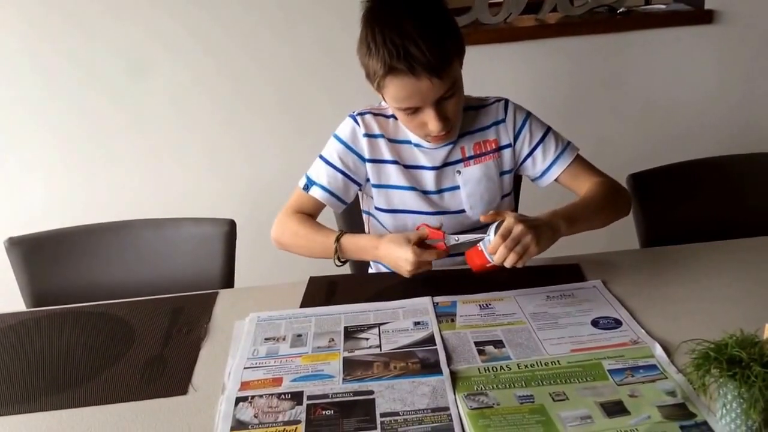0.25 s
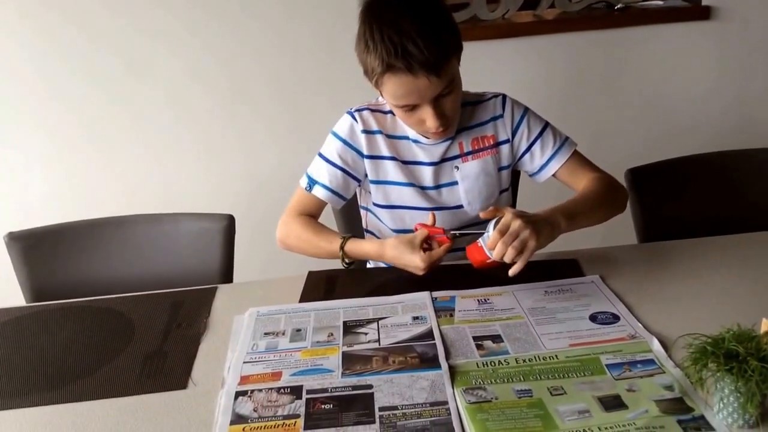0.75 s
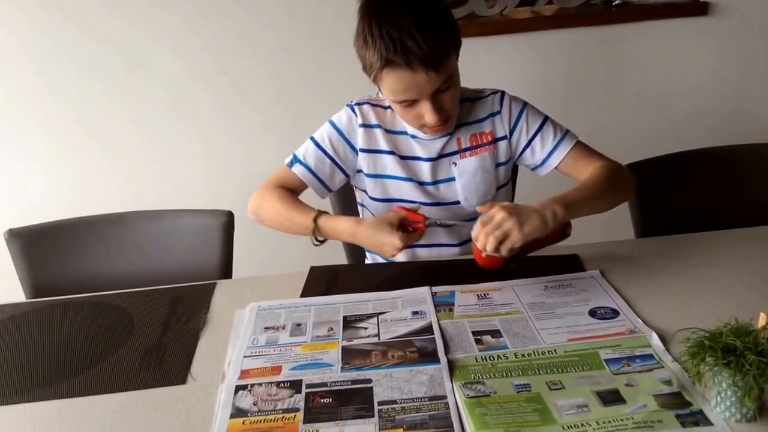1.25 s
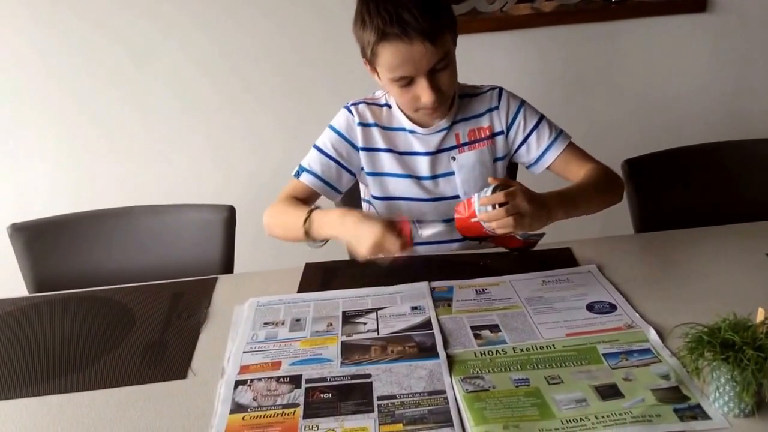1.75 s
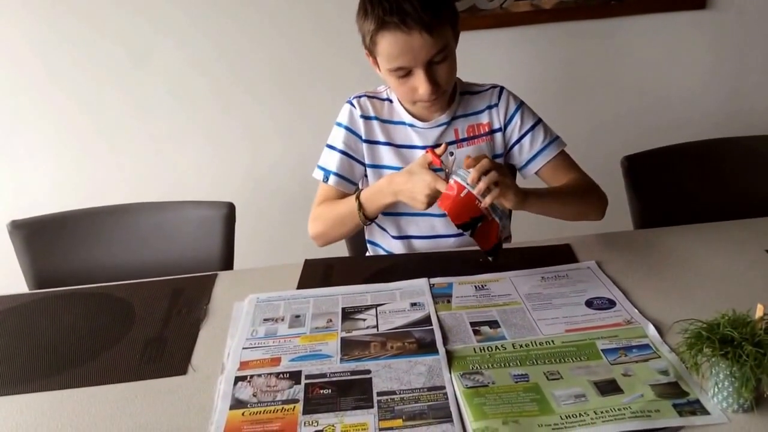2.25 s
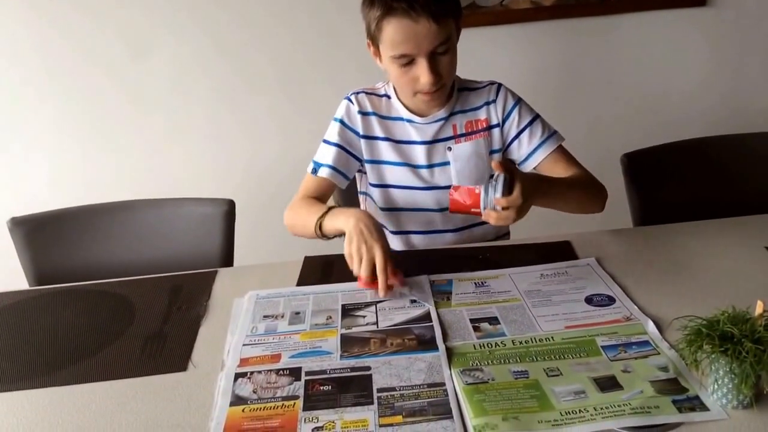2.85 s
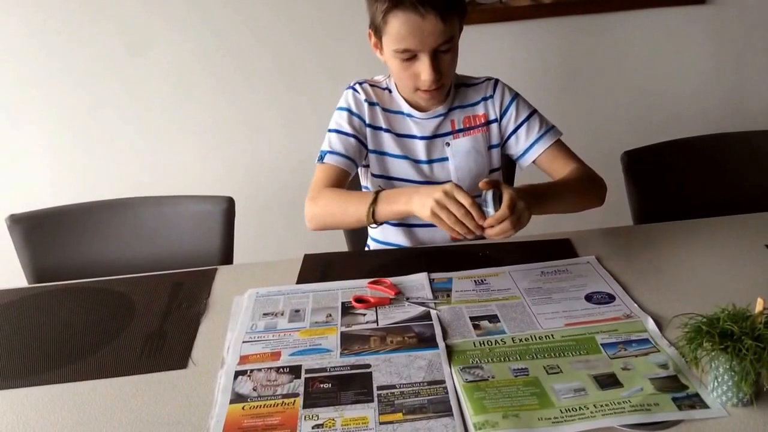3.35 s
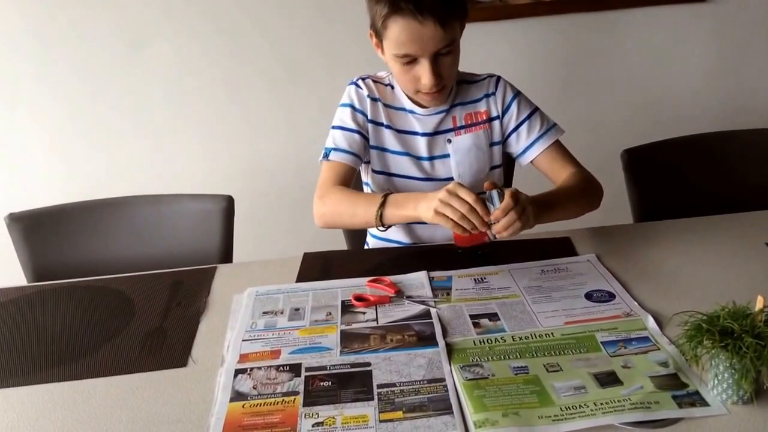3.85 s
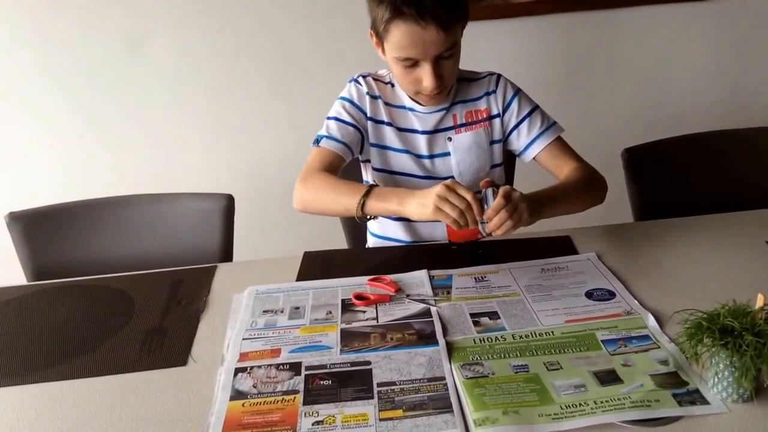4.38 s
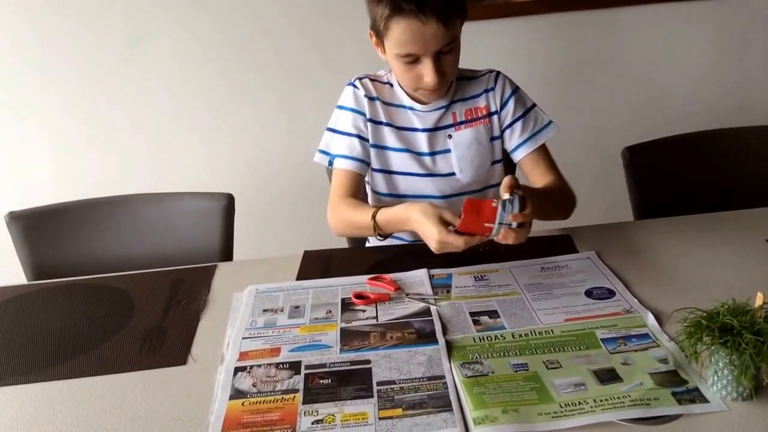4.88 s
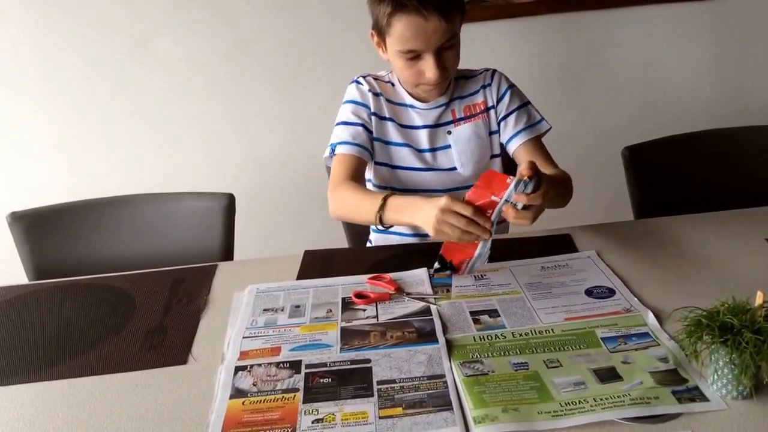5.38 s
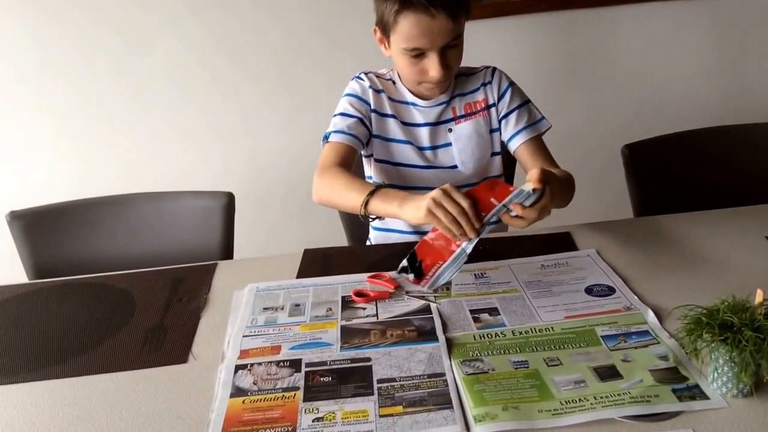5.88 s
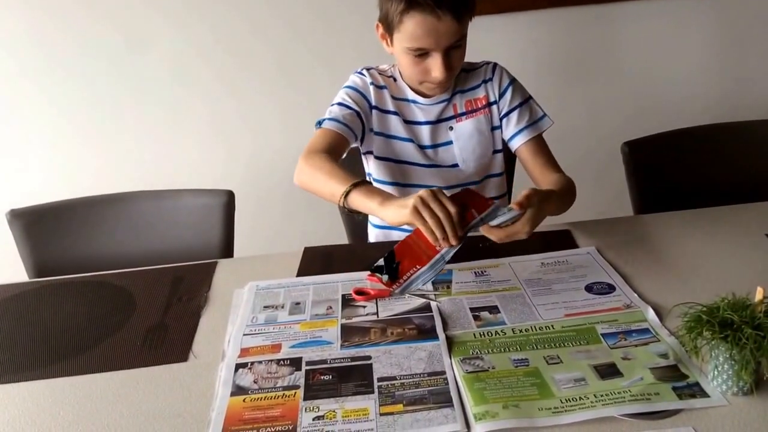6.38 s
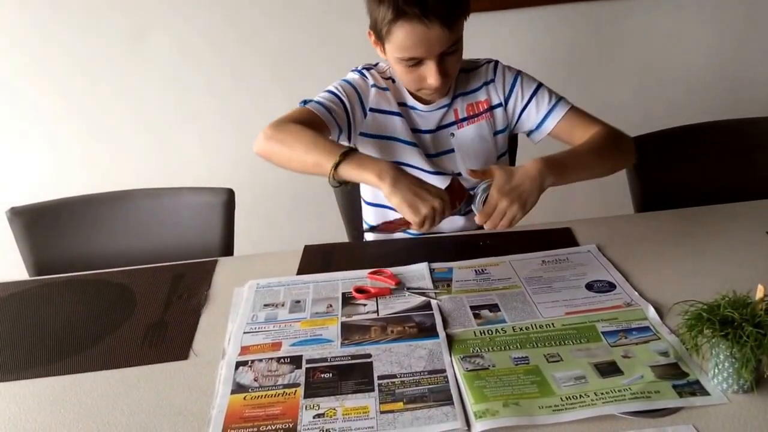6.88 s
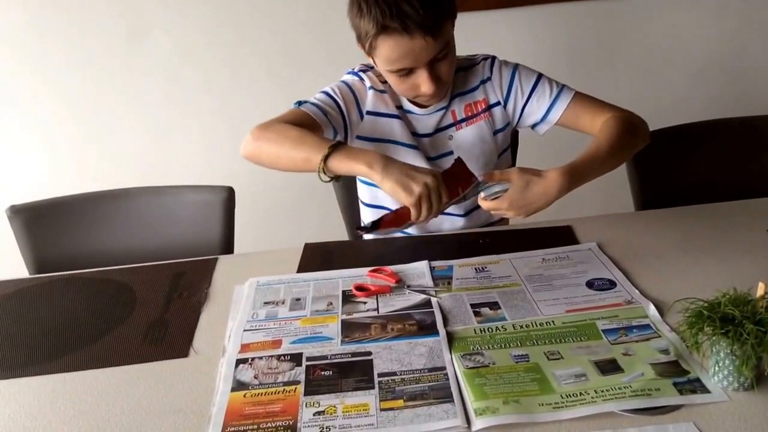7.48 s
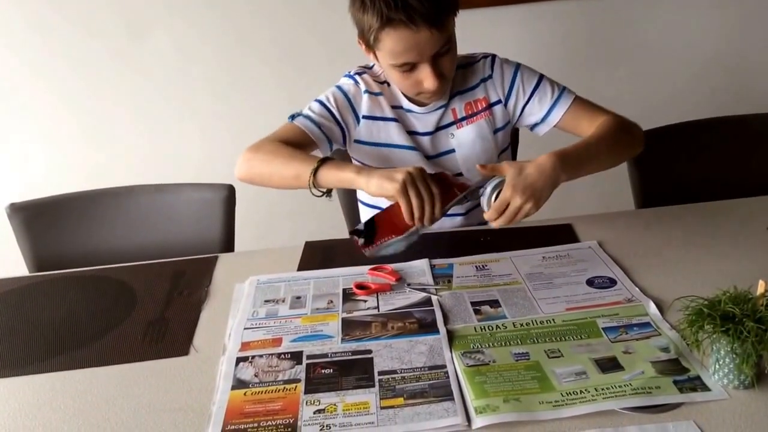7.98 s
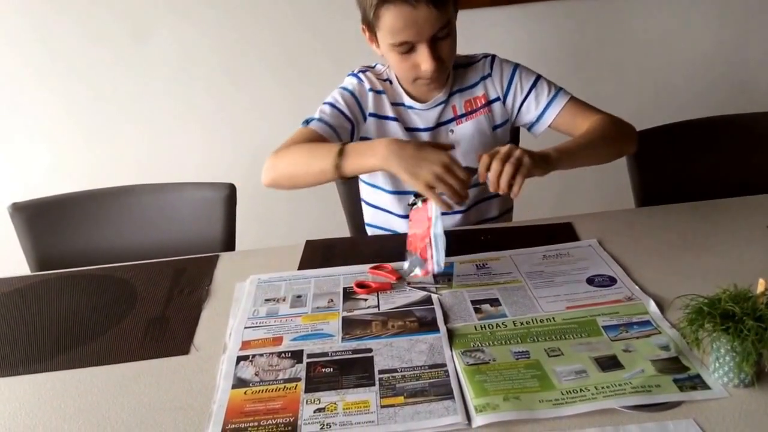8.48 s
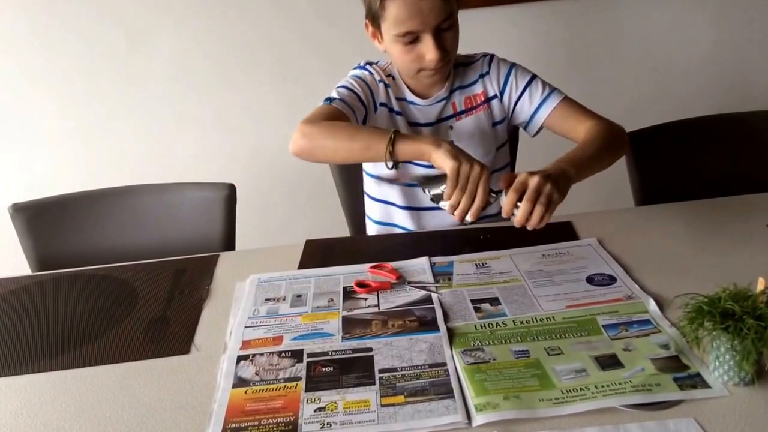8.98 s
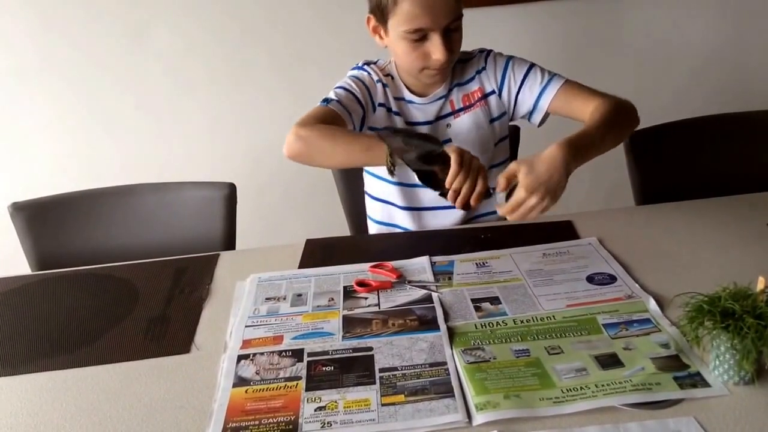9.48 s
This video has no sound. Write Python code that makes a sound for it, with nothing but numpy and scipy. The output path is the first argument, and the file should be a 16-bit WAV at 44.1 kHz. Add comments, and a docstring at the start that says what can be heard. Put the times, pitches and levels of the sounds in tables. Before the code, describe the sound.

Nearly quiet opening with tiny scissor clicks and small metallic squeaks, then snaps from the cut can and a double clack of scissors onto a paper-covered table. Crinkling thin metal follows, dry snaps with hollow knocks building to two hard pops as the sheet is peeled open. Activity thins, then a squeak and more snaps finish the tear. Single-channel pickup, short bright room reverberation, low hum and faint hiss.

```python
"""Drinks can cut and torn open

A thin can is snipped with scissors, then torn and peeled open by hand at a table in a hard-walled room.
Snaps and scrapes are shaped noise filtered by sheet resonances; crinkling is noise raised by random ticks.
Pops and clicks are short sine pulses, squeaks narrow-band noise, can rings decaying sine modes.
Hollow knocks and table thuds are decaying coloured noise. A low hum and faint hiss lie under it.
"""
import sys
import numpy as np
from scipy import signal
from scipy.fft import rfft, irfft, next_fast_len
from scipy.io import wavfile
from scipy.ndimage import uniform_filter1d, map_coordinates

SR = 44100
rng = np.random.default_rng(int(sys.argv[2]) if len(sys.argv) > 2 else 0)


def unload_wav(signal):
    """Save mono or channel-first audio to the path in sys.argv[1] as 16-bit WAV at rate SR, clipped to [-1, 1]."""
    wavfile.write(
        sys.argv[1],
        SR,
        np.round(np.clip(np.atleast_2d(signal).T, -1, 1) * 32767).astype(np.int16),
    )


N = 429534

# Event levels are nominal: before layer gain, resonances and room.
# Creases giving way or blades clacking; body = panel share, sheen = sharpness of kink:
# (time [s], level [dB], body [dB re level], sheen [dB re level])
SNAP_EVENTS = [(0.024, -63, 4.5, -0.5), (0.323, -60.5, -4.5, -15), (0.682, -62.5, 3, -7),
               (1.04, -67.5, 4, -1), (1.324, -52, 0.5, 7), (1.485, -40.5, -2, -11.5),
               (1.57, -39.5, -14.5, -7), (1.667, -48.5, -4, 1.5), (1.826, -69, 2, 2.5),
               (1.941, -61.5, 1, -1), (2.252, -73.5, -1, 4), (2.404, -69.5, -10, 13.5),
               (2.481, -66, 1, 8.5), (2.57, -63.5, -5, 1.5), (2.621, -70, 9, -4), (2.895, -53, -8, 13),
               (3.015, -53.5, -2, 11.5), (3.489, -42, -5.5, -0.5), (3.543, -44.5, 5.5, -15),
               (3.578, -41, 0.5, -25), (3.812, -60.5, 11, 7.5), (3.897, -37.5, -3.5, -7),
               (4.004, -36.5, -3.5, -2.5), (4.218, -40.5, 0, 1), (4.543, -48.5, 0.5, -23),
               (4.573, -35.5, 1, -9), (4.647, -42, -13, -10), (4.863, -43.5, -6, -10), (4.901, -34, -3, 7),
               (5.124, -39.5, -6.5, -1.5), (5.153, -40, -6, -19), (5.304, -34, -4, -5),
               (5.404, -30.5, -7, -6.5), (5.451, -31, -8.5, -2), (5.881, -25, -16.5, -3),
               (5.932, -27.5, -11, 2), (6.179, -30.5, -9.5, -4), (6.221, -38, -21, -8),
               (6.27, -46, -2.5, -3), (6.308, -36, -10.5, -7), (6.413, -36.5, -7, -2),
               (6.446, -39, -16, -1), (6.665, -36.5, -15, -4.5), (6.772, -49, -4, -6.5),
               (6.895, -65.5, -6, -14.5), (7.224, -62.5, -18, -8), (7.36, -45, -9.5, -9),
               (7.471, -54.5, -7, -10), (7.581, -50, 1, -17), (7.888, -58, 4, -22),
               (7.933, -40.5, -4.5, -4.5), (8.045, -35.5, -12, 5.5), (8.109, -38.5, -9.5, 0),
               (8.243, -48, -1.5, 2.5), (8.625, -36.7, -9, 0.5), (8.712, -36, -10, 2),
               (8.778, -35.5, -19, -3.5), (8.87, -44.5, -13, -27), (8.967, -30, -9, 8),
               (9.633, -63, -12.5, -3)]
# Cut edges and blades rubbing: (time [s], level [dB], sheen [dB re level], length [s])
SCRAPE_EVENTS = [(1.052, -61.5, -4, 0.087), (1.608, -52, -15, 0.05), (2.374, -67, 0, 0.069),
                 (2.626, -69.5, 3, 0.044), (2.905, -60, 10, 0.035), (3.505, -51, -4, 0.035),
                 (3.592, -51, -25, 0.058), (3.983, -44, -14.5, 0.049), (4.13, -54.5, -5, 0.059),
                 (4.25, -48.5, -1, 0.052), (4.416, -57, -8, 0.044), (5.286, -50, -5.5, 0.02),
                 (5.868, -47, -12, 0.016), (8.359, -61.5, 12.5, 0.04), (8.435, -51, 6.5, 0.052),
                 (8.731, -45, -8.5, 0.092)]
# Short pops and clicks: scissors laid on the table, later dents flipping through:
# (time [s], level [dB], pitch [Hz])
POP_EVENTS = [(2.8948, -26, 1960), (3.016, -27, 860), (5.405, -4.5, 3130), (5.885, -5.5, 3150),
              (6.18, -11, 3200), (7.363, -24, 2680), (7.934, -24, 3440), (9.12, -23, 2230),
              (9.634, -40.5, 2500)]
# Scissors, later the sheet, knocking on the table: (time [s], level [dB])
THUD_EVENTS = [(2.895, -43.5), (3.013, -37), (3.034, -45), (3.058, -53), (5.575, -54)]
# Uncrushed can ringing on: (time [s], level [dB])
RING_EVENTS = [(1.325, -67), (1.485, -59.5), (1.665, -55), (2.62, -72)]
# Modes of the round can: (frequency [Hz], relative level [dB], T60 [s])
CAN_MODES = [(689, -7, 1.37), (860, -13, 1.4), (1088, -2, 1.44), (1560, -13, 0.7), (1690, -9, 1.2),
             (1960, -5, 1), (2100, -11, 1), (2740, -2, 0.46), (4253, -16, 0.64)]
# Blade or can squeaks and pings: (time [s], level [dB], pitch [Hz])
SQUEAK_EVENTS = [(.025, -50.5, 990), (.323, -64, 1790), (.684, -53, 1024), (1.079, -55, 2740),
                 (1.325, -54, 1890), (2.362, -66, 2690), (2.618, -57.5, 2660), (7.683, -56, 744),
                 (7.855, -56.5, 2960), (7.89, -58, 3030), (8.25, -43, 2810), (8.37, -49, 5390),
                 (8.716, -33.5, 2350)]
# Fingers squeezing and bending the sheet: (middle [s], full width at 1/e [s], level [dB])
SQUEEZES = [(0.1, .35, -77.5), (1.55, .7, -68), (2.5, .4, -76), (3.64, .16, -56.5), (4.25, .9, -57),
            (5.35, .5, -50), (6.2, .4, -58), (8.6, .7, -74), (9.17, .22, -65)]
# Low, hollow knocks, mostly together with snaps: (time [s], level [dB])
HOLLOW_KNOCK_EVENTS = [(1.075, -57.5), (1.323, -57.5), (1.941, -60), (2.508, -61.5), (3.897, -48),
                       (4.004, -46.5), (4.219, -50), (4.575, -51), (4.901, -44.5), (5.152, -47),
                       (6.412, -43), (6.852, -59), (7.581, -52.5), (8.777, -56), (8.967, -46)]
# Resonances of the opened sheet: (centre [Hz], width at half the dB lift [Hz], lift [dB])
SHEET_RESONANCES = [(487, 38, 5), (740, 220, 4), (1080, 8, 4.5), (1531, 21, 7.5), (1633, 110, 1),
                    (1936, 130, 2.5), (2444, 160, 3.5), (2765, 130, 5), (3100, 100, 2), (3586, 430, 3),
                    (4055, 97, 3), (8400, 1700, 1.5)]
# Edges of the bass, middle, treble and top bands: (frequency [Hz])
BAND_EDGES_HZ = [250, 900, 2200, 5500, 15500]
# Ends of each band's level plateau, two per band: (frequency [Hz])
BAND_FLATS_HZ = [500, 780, 1100, 1900, 2550, 4100, 6500, 12500]
# Crinkle spectrum ahead of the sheet resonances: (frequency [Hz], relative level [dB])
CRINKLE_SPECTRUM = [(100, -16), (500, -4.5), (1000, 2), (1600, -2.5), (3000, -2.5), (6000, -16),
                    (15000, -16)]
# Table-top spectrum: (frequency [Hz], relative level [dB])
TABLE_SPECTRUM = [(28, -10), (60, -5), (150, 8), (290, 13), (420, 11), (750, 10), (1200, -9), (2500, -37),
                  (8000, -50)]
# Spectrum of the faint hiss: (frequency [Hz], relative level [dB])
AIR_SPECTRUM = [(30, -24.5), (45, -3), (70, 2), (150, 4), (250, 1), (500, -4), (1000, -9), (3000, -19),
                (7000, -21.5), (8500, -23), (9100, -15), (9800, -20), (15500, -26)]
# Colour of the hollow knocks: (frequency [Hz], relative gain [dB])
HOLLOW_RESPONSE = [(100, -23), (190, -15.5), (300, -6.5), (480, -0.5), (780, 0.5), (1100, -10.5),
                   (3000, -45)]
# Room decay: (frequency [Hz], T60 [s])
ROOM_DECAY = [(150, 0.83), (500, 0.42), (1500, 0.9), (3000, 0.75), (5000, 0.78), (8000, 0.52),
              (14000, 0.29)]
# Initial colour of the room tail: (frequency [Hz], relative level [dB])
ROOM_TAIL_COLOUR = [(150, 0.05), (500, -2), (1500, 2), (3500, -0.28), (8000, -0.11), (14000, 2)]

LEAD_SAMPLES = 512  # kept ahead of each snap and scrape onset


def amp(db):
    """Amplitude ratio of a level in dB."""
    return 10 ** (np.asarray(db) / 20)


def unit(x):
    """x scaled to rms 1."""
    return x / np.sqrt(np.mean(x ** 2) + 1e-20)


def along(points, hz):
    """Interpolate (Hz, value) points on a log-frequency axis."""
    point_hz, values = np.transpose(points)
    return np.interp(np.log(hz + 1), np.log(point_hz), values)


def clock(size):
    """Sample times in seconds."""
    return np.arange(size) / SR


def wobble(rate_hz):
    """Smooth random curve with rate_hz knots a second."""
    knots = rng.standard_normal(int(N * rate_hz / SR) + 4)
    return map_coordinates(knots, [clock(N) * rate_hz])


def coloured(x, gain):
    """x times a frequency-dependent gain."""
    hz = np.fft.rfftfreq(len(x), 1 / SR)
    return irfft(rfft(x) * gain(hz), len(x))


def noise(spectrum, size):
    """Noise of rms 1 with a (Hz, dB) spectrum."""
    white = rng.standard_normal(size)
    return unit(coloured(white, lambda hz: amp(along(spectrum, hz))))


def add(track, time_s, x):
    """Mix x into the track from time_s on."""
    part = track[max(0, round(time_s * SR)):][:len(x)]
    part += x[:len(part)]


def in_room(x, wet_db, sent=None, build_s=0.0027, bounce=0.18):
    """Direct sound, table bounce and a diffuse wall tail with frequency-dependent decay."""
    white = rng.standard_normal(SR * 3 // 4)
    hz, t, z = signal.stft(white, SR, nperseg=256)
    decay_db = 60 * t / along(ROOM_DECAY, hz)[:, None]
    fade_db = along(ROOM_TAIL_COLOUR, hz)[:, None] - decay_db
    tail = signal.istft(z * amp(fade_db), SR, nperseg=256)[1]
    tail *= 1 - np.exp(-(clock(len(tail)) / build_s) ** 2)
    tail *= amp(wet_db) / np.linalg.norm(tail)
    out = signal.fftconvolve(x if sent is None else sent, tail)
    add(out, 0, x)
    bounce_delay_s = rng.uniform(0.00034, 0.0018)  # random height of the hands
    add(out, bounce_delay_s, bounce * x)
    return out


def causal(db):
    """Minimum-phase response with these gains: it rings only after it is struck."""
    cepstrum = irfft(np.log(amp(db)))
    half = len(cepstrum) // 2
    folded = np.r_[cepstrum[0], 2 * cepstrum[1:half]]
    return np.exp(rfft(folded, len(cepstrum)))


def evened(z, size):
    """Spectrum with peaks and dips wider than size bins levelled out."""
    power = np.abs(z) ** 2
    local_power = np.abs(uniform_filter1d(power, size)) + 1e-20
    return z * np.sqrt(power.mean() / local_power)


def sheet_db(hz):
    """Lift in dB from the sheet's resonances."""
    return sum(db / (1 + (2 * (hz - centre) / width) ** 2) for centre, width, db in SHEET_RESONANCES)


def band_levels(db, body_db, sheen_db, bass_db=-10):
    """Bass, middle, treble, top: the panel adds the lower two, a sharp kink the top."""
    return db + np.array([body_db + bass_db, body_db, 0, sheen_db])


def metal_colour(levels, hz, ripple_db=2.5, ripple_hz=170, bass_slope_db=9, dulling=0.73):
    """Sheet response in dB for four band levels, with a new random ripple for each bend."""
    density = np.asarray(levels) - 10 * np.log10(np.diff(BAND_EDGES_HZ) / (SR / 2))
    plateaus = np.c_[BAND_FLATS_HZ, np.repeat(density, 2)]
    db = along(plateaus, hz) + sheet_db(hz)
    octaves_below = np.minimum(0, np.log2((hz + 1) / BAND_FLATS_HZ[0]))
    db += bass_slope_db * octaves_below  # a small sheet radiates little bass
    # a dull slip keeps falling through the treble
    top_slope_db = dulling * np.clip(density[3] - density[2], -25, 0)
    db += top_slope_db * along([(4500, 0.14), (6000, -0.67), (9000, -0.32), (15500, 1.0)], hz)
    return db + ripple_db * map_coordinates(rng.standard_normal(256), [hz / ripple_hz])


def metal(levels, shape, spiky, wet_db):
    """Tiny slips excite the sheet; the walls hear all sides of it, so their feed is smoother."""
    sizes = np.exp(spiky * np.repeat(rng.standard_normal(len(shape) // 16), 16))
    grains = unit(sizes * rng.standard_normal(len(shape)))
    slips = rfft(shape * grains)
    hz = np.fft.rfftfreq(len(shape), 1 / SR)
    sheet = causal(metal_colour(levels, hz))
    direct = irfft(evened(slips, size=280) * sheet)
    to_walls = irfft(evened(slips, size=26) * sheet)
    return in_room(direct, wet_db, sent=to_walls)


def background(hum_hz=100, hum_db=-67.5, air_db=-68.5, waver_db=1, drift_rad=.15):
    """Mains hum, slightly unsteady in phase and level, over steady room noise."""
    phase = 2 * np.pi * hum_hz * clock(N) + drift_rad * wobble(8)
    hum = np.sqrt(2) * np.sin(phase)
    hum_level = amp(hum_db + waver_db * wobble(4.3))
    return hum_level * hum + amp(air_db) * noise(AIR_SPECTRUM, size=N)


def squeezing():
    """Each squeeze swells and eases off in a smooth bell."""
    t = clock(N)
    return sum(amp(db) * np.exp(-(2 * (t - middle) / length) ** 2) for middle, length, db in SQUEEZES)


def crinkle(rate_hz=150, scatter_db=6, t60_s=0.012, gain_db=-2, wet_db=-2):
    """Countless small decaying ticks as the fingers bend the sheet."""
    sizes_db = scatter_db * np.minimum(rng.standard_normal(N), 2)
    ticks = (rng.random(N) < rate_hz / SR) * amp(sizes_db)
    decay = amp(-60 * clock(4096) / t60_s)
    power = signal.fftconvolve(ticks ** 2, decay ** 2)[:N]
    slips = np.sqrt(np.abs(power)) * rng.standard_normal(N)
    grains = unit(coloured(slips, lambda hz: amp(along(CRINKLE_SPECTRUM, hz) + sheet_db(hz))))
    return in_room(grains * amp(gain_db) * squeezing(), wet_db)[:N]


def snaps(gain_db=-2.0, wet_db=-3, strain_db=-25, strain_s=0.023, t60_s=0.071, sheen_halves_db=38.5):
    """A crease strains, lets go at once and is damped by the hands; sharp kinks die sooner."""
    out, t = np.zeros(N), clock(8192) - LEAD_SAMPLES / SR
    after = np.maximum(t, 0)
    attack = 1 - np.exp(-after / .0005)
    for time_s, db, body_db, sheen_db in SNAP_EVENTS:
        levels = band_levels(db, body_db, sheen_db)
        snap_t60_s = t60_s * 2 ** (-sheen_db / sheen_halves_db)  # more sheen by this many dB halves it
        shape = attack * amp(-60 * after / snap_t60_s)
        shape /= np.sqrt(np.mean(shape[(t > 0) & (t < .015)] ** 2))
        shape += amp(strain_db) * np.exp(-np.abs(t) / strain_s)
        add(out, time_s + t[0], metal(levels, shape, spiky=0.39, wet_db=wet_db))
    return amp(gain_db) * out


def squeaks(width_hz=170, t60_s=0.12, wet_db=-6):
    """A slip excites one narrow resonance of blade or can."""
    out, t = np.zeros(N), clock(16384)
    for time_s, db, pitch_hz in SQUEAK_EVENTS:
        white = rng.standard_normal(len(t))
        tone = unit(coloured(white, lambda hz: 1 / (1 + (2 * (hz - pitch_hz) / width_hz) ** 2)))
        add(out, time_s, in_room(amp(db - 60 * t / t60_s) * tone, wet_db))
    return out


def scrapes(gain_db=-1, wet_db=-2, body_db=-3.5):
    """Edges slide in a short, gritty swell; every scrape has the same panel share."""
    out, t = np.zeros(N), clock(8192) - LEAD_SAMPLES / SR
    for time_s, db, sheen_db, length_s in SCRAPE_EVENTS:
        levels = band_levels(db, body_db, sheen_db)
        swell = np.sqrt(np.abs(np.sin(np.pi * np.clip(t / length_s, 0, 1))))
        add(out, time_s + t[0], metal(levels, swell, spiky=0.22, wet_db=wet_db))
    return amp(gain_db) * out


def hollow_knocks(t60_s=0.073, wet_db=-5, attack_s=.001):
    """Decaying low noise gives a short hollow knock."""
    out, t = np.zeros(N), clock(11000)
    shape = (1 - np.exp(-t / attack_s)) * amp(-60 * t / t60_s)
    response = causal(along(HOLLOW_RESPONSE, np.fft.rfftfreq(len(t), 1 / SR)))
    for time_s, db in HOLLOW_KNOCK_EVENTS:
        burst = rfft(shape * rng.standard_normal(len(t)))
        knock = irfft(evened(burst, size=40) * response)
        knock /= np.sqrt(np.mean(knock[t < .015] ** 2))
        add(out, time_s, in_room(amp(db) * knock, wet_db))
    return out


def rings():
    """Knocks leave the wall of the still-round can ringing faintly in its modes."""
    out, t = np.zeros(N), clock(SR)
    for time_s, db in RING_EVENTS:
        for hz, mode_db, t60_s in CAN_MODES:
            strength = rng.uniform(.85, 1.15)
            envelope = strength * amp(db + mode_db - 60 * t / t60_s)
            add(out, time_s, envelope * np.sin(2 * np.pi * hz * t))
    return out


def pops(cycles=1.02, wet_db=-6):
    """A buckling dent or a scissors click gives a sine pulse of two or three cycles."""
    out, t = np.zeros(N), clock(512) - 256 / SR  # pulse centred on the event
    for time_s, db, hz in POP_EVENTS:
        pulse = np.sin(2 * np.pi * hz * t) * np.exp(-(hz * t / cycles) ** 2)
        add(out, time_s + t[0], in_room(amp(db) * pulse, wet_db))
    return out


def thuds(t60_s=0.13, wet_db=0):
    """The knocked table top answers dully: decaying low noise."""
    out, t = np.zeros(N), clock(16384)
    for time_s, db in THUD_EVENTS:
        knock = amp(db - 60 * t / t60_s) * noise(TABLE_SPECTRUM, size=16384)
        add(out, time_s, in_room(knock, wet_db))
    return out


def scene():
    """All sounds of can, scissors, table and room, summed to one channel."""
    handling = crinkle() + snaps() + squeaks() + scrapes() + hollow_knocks() + rings() + pops()
    return (background() + handling + thuds())[None]


def record(dry, top_hz=15650):
    """Steep low-pass at the recorder's band limit."""
    padded = np.pad(dry[0], (0, next_fast_len(N + 8192) - N))
    return coloured(padded, lambda hz: 1 / (1 + (hz / top_hz) ** 160))[None, :N]


dry = scene()
out = record(dry)
unload_wav(out)
```